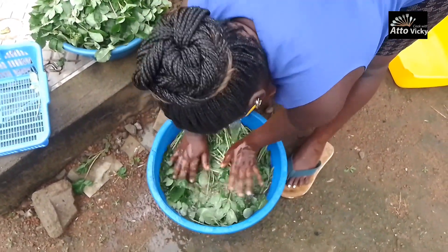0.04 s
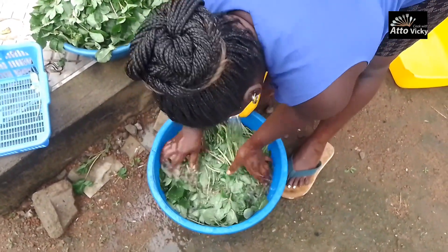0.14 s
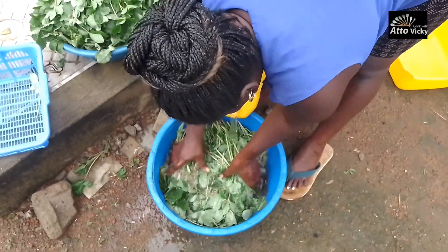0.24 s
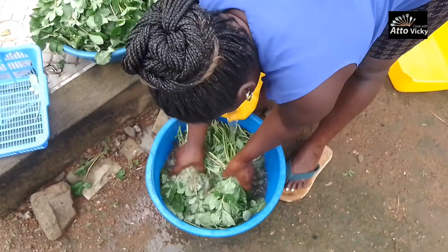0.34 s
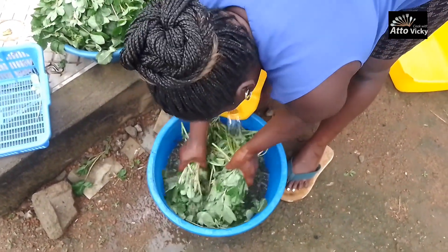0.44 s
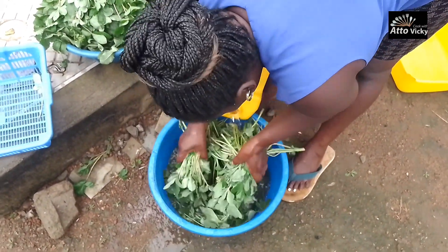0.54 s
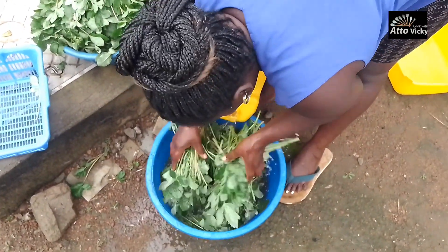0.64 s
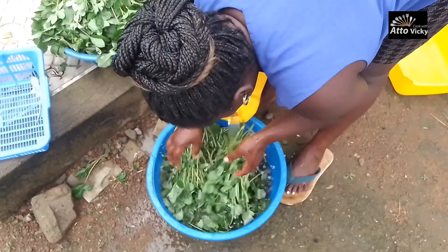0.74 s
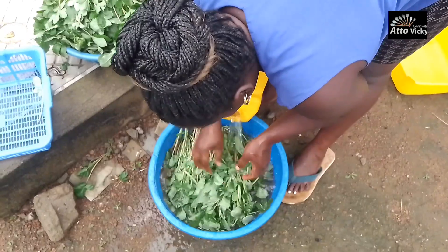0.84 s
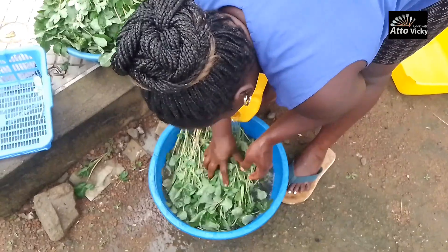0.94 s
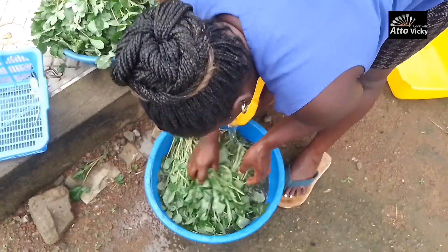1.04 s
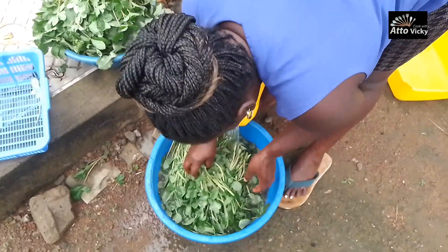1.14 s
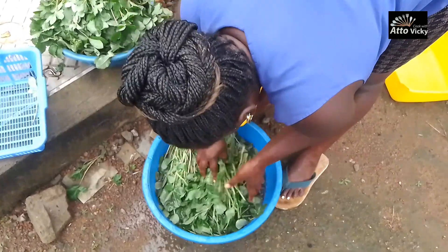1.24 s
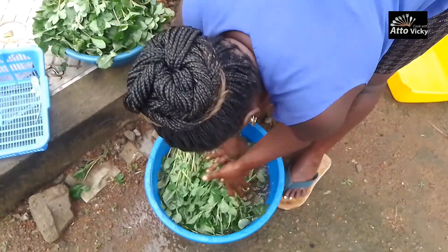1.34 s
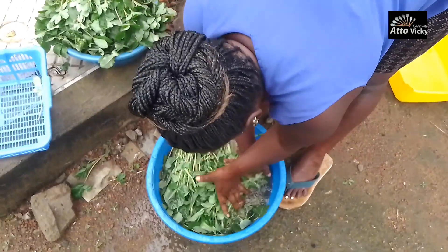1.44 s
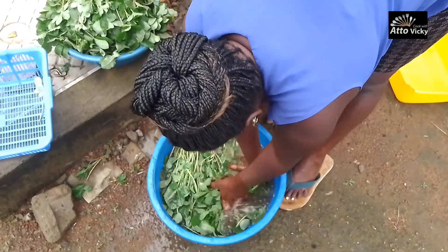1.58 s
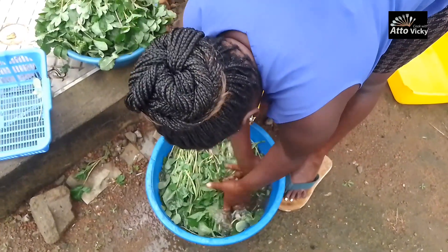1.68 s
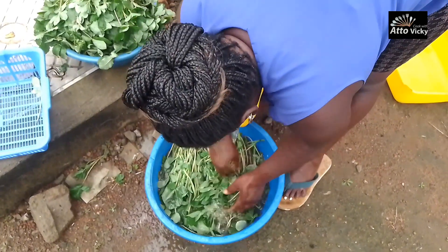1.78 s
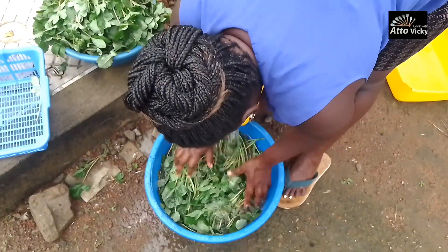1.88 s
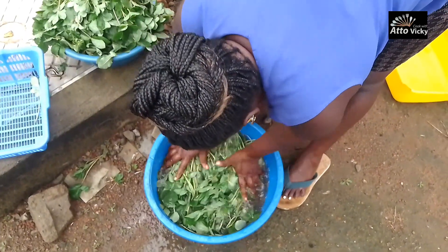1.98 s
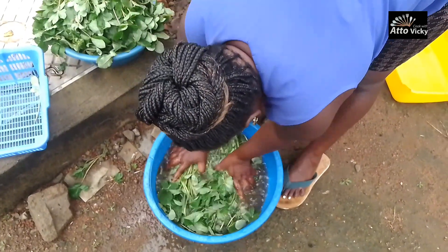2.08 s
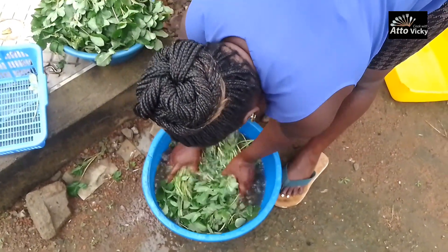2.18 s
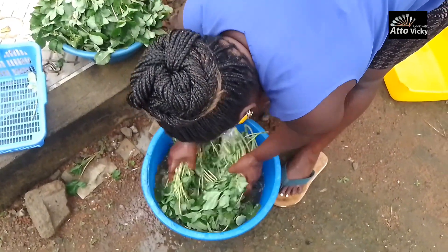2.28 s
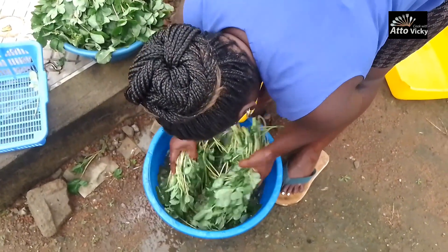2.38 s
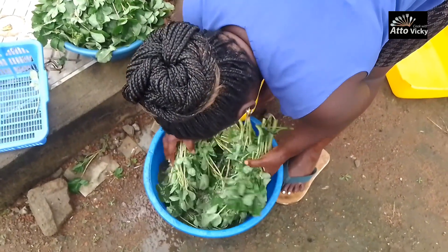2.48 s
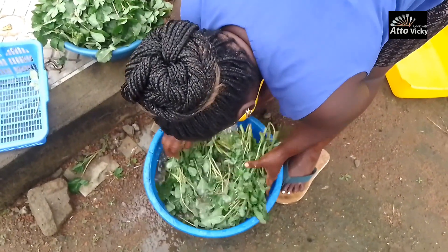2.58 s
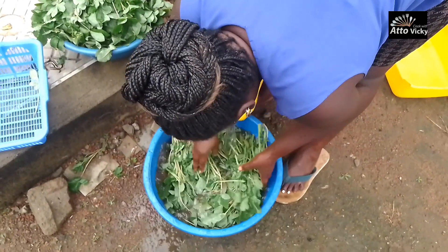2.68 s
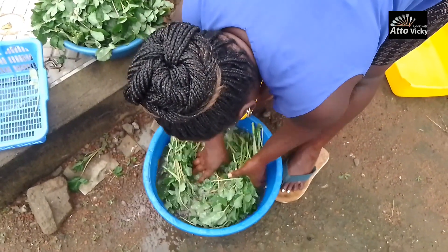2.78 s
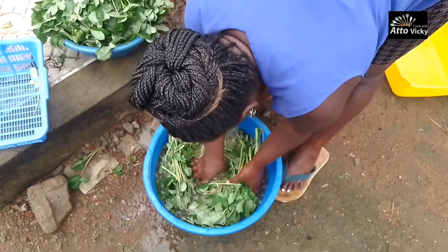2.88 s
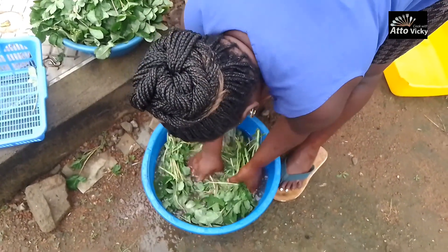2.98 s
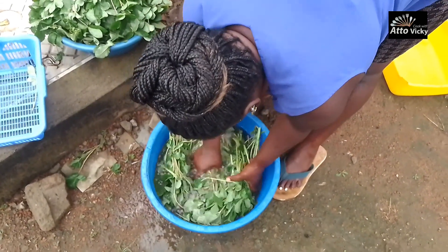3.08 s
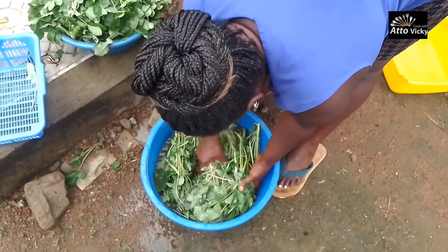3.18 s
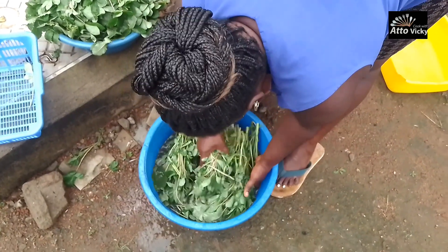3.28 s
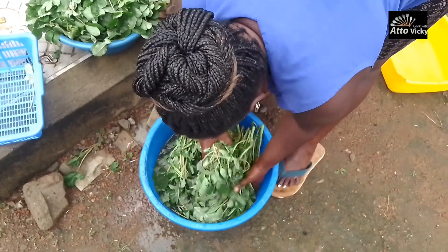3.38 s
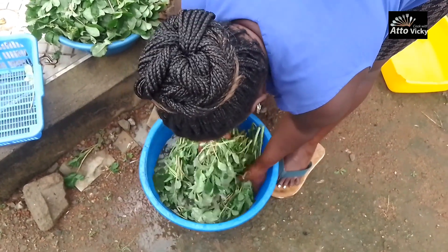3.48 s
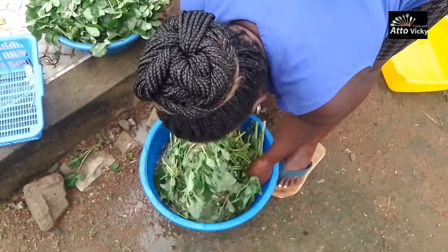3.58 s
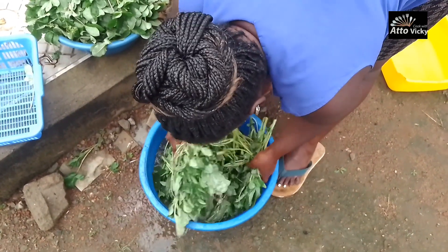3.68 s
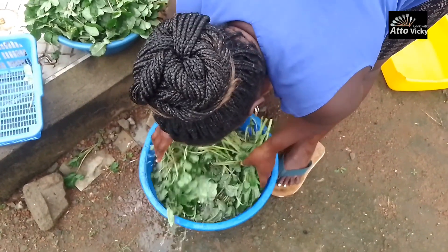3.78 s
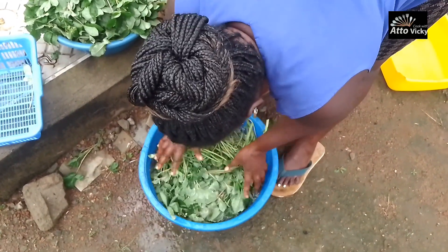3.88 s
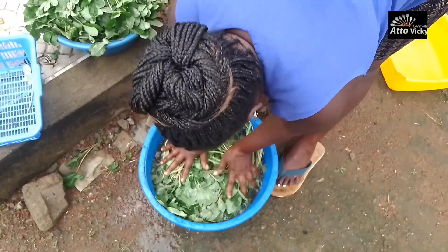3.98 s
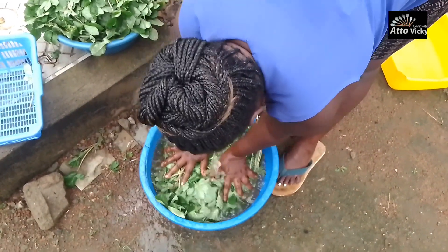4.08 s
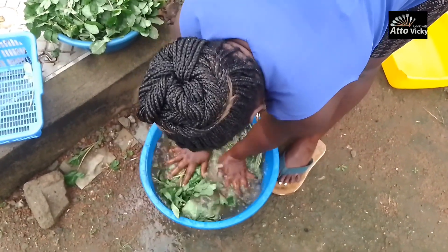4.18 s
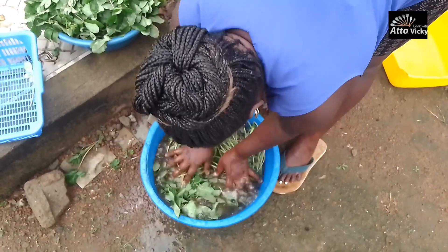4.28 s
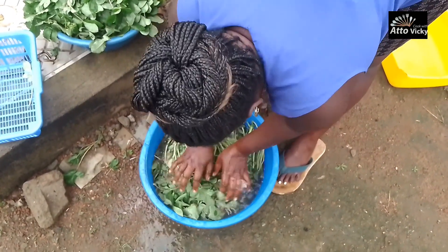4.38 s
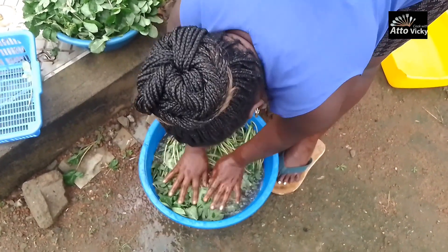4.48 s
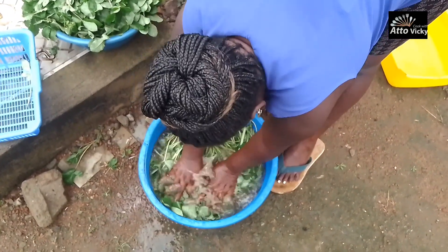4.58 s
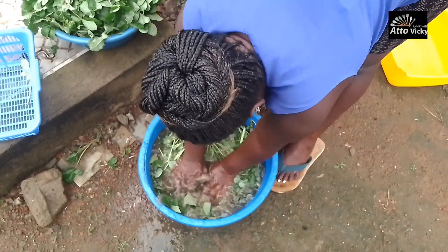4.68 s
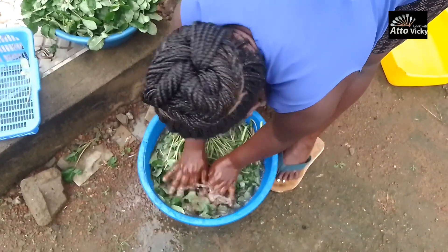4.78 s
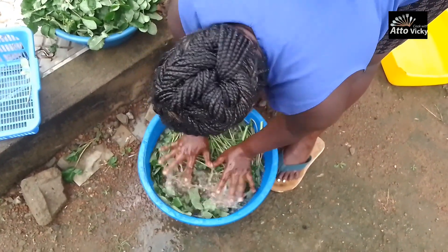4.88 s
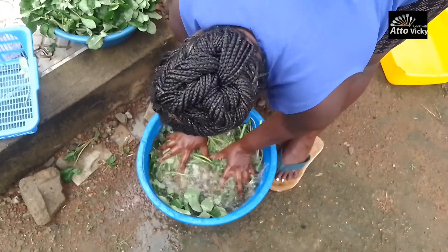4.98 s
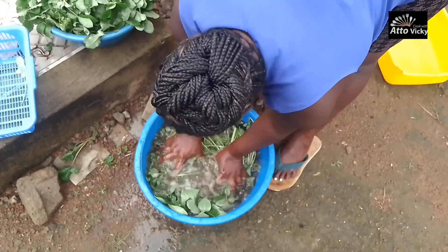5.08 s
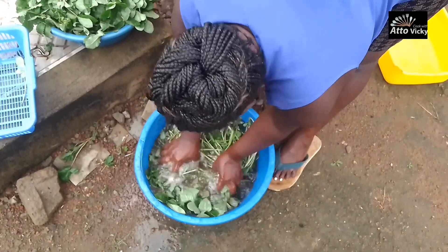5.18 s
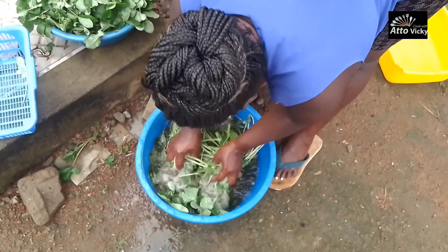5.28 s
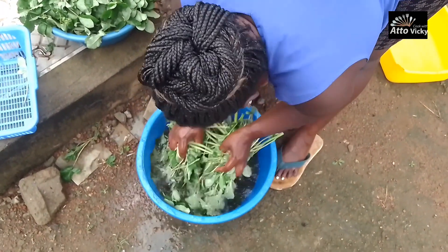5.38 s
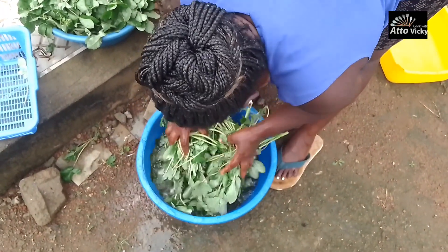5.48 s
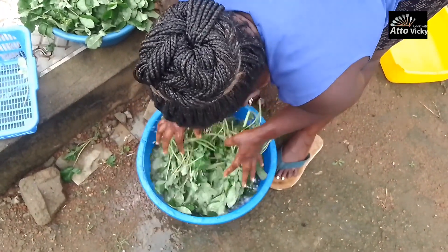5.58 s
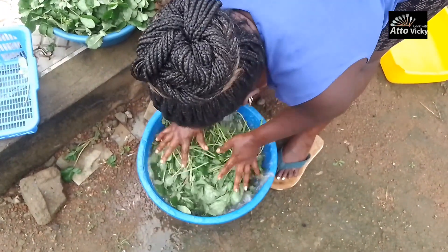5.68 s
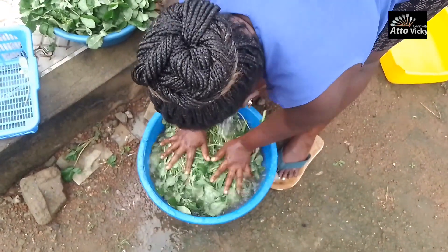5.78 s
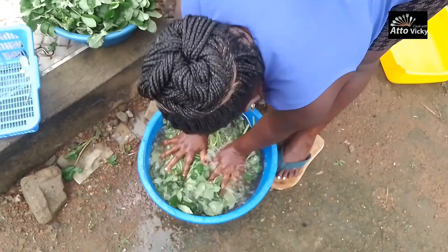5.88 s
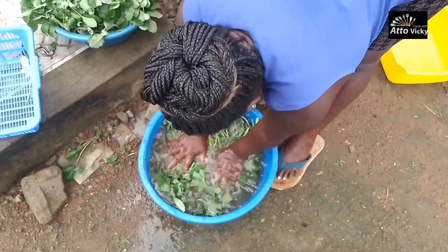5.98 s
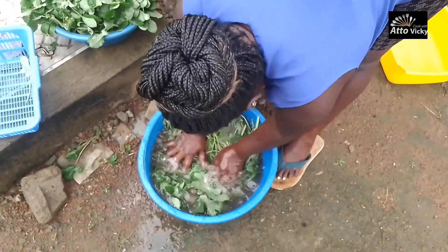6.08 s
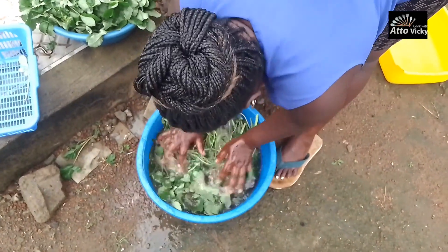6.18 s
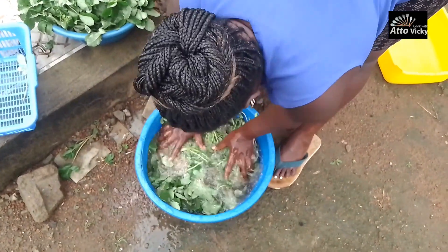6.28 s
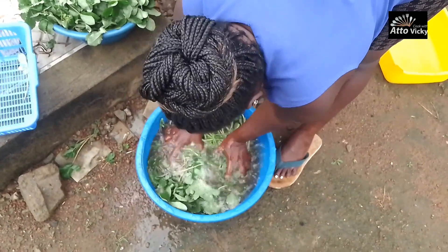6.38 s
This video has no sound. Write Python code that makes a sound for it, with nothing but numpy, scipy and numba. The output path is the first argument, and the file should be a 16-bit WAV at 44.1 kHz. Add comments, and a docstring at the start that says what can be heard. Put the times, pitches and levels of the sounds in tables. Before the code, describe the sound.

Bright, crisp water sounds from a small plastic tub: greens pushed under and squeezed, releasing sprays of tiny bubbles, brittle wet snaps and low bubbling. It starts lightly, bursts hard once early, calms to trickling and glugs, surges twice around a quiet gap, then becomes busy and splashy, the final squeeze still fizzing at the cut. The basin gives a short hollow ring; the outdoor background is only a faint wavering hiss.

```python
"""Hands knead leafy greens in a plastic basin of water outdoors, heard from above, over a faint hiss.
Low plops and light snaps open; a hard squeeze before one second brings a spray of tiny bubbles and a loud snap.
Gentler trickling and low glugs follow, then hard squeezes near 2.7 s, a lull, and another hard one near 3.9 s.
From 4.6 s squeezes crowd together; a last one near 6.35 s, with small snaps, still sprays as the scene ends.
Bubbles are rising, dying sine tones; snaps are noise cracks; the basin adds resonances and echoes."""
import sys
import numpy as np
from scipy import signal
from scipy.fft import rfft, irfft
from scipy.io import wavfile
from scipy.ndimage import uniform_filter1d, map_coordinates
from numba import njit

SR = 44100
rng = np.random.default_rng(int(sys.argv[2]) if len(sys.argv) > 2 else 0)


def persist_wave(psi):
    """Save psi, clipped to +-1, as 16-bit WAV."""
    counts = np.round(np.clip(psi, -1, 1) * 32767).astype(np.int16)
    wavfile.write(sys.argv[1], SR, np.atleast_2d(counts).T)


N = 284004  # length in samples, about 6.4 s

# Tone colour from the echo of the basin rim and the microphone: pitch_hz [Hz], level_db [dB]
RIM_COLOUR = [(150, -33), (230, -18), (650, -13.5), (1100, -10.5), (1430, -30), (1900, -20.5), (2850, -28),
              (4000, -18.5), (6000, -16), (7300, -8), (8200, -3), (10400, -5.5), (11500, -13.5),
              (12800, -10), (14300, -17), (15400, -11.5)]


def undb(db):
    """Turn decibels into an amplitude gain."""
    return 10 ** (np.asarray(db) / 20)


def power_from_db(db):
    """Turn decibels into power, the square of the amplitude gain."""
    return undb(2 * db)


def unit(x):
    """Scale a signal to an rms level of 1."""
    return x / np.sqrt(np.mean(x ** 2))


def shape(x, table):
    """Filter through (Hz, dB) points; folding the cepstrum makes the filter respond without looking ahead."""
    hz, db = np.transpose(table)
    size = 2048
    grid_hz = np.maximum(np.arange(size // 2 + 1), 1) * SR / size
    log_gain = np.interp(np.log(grid_hz), np.log(hz), db) * np.log(10) / 20
    cepstrum = irfft(log_gain)
    cepstrum[1:size // 2] *= 2
    cepstrum[size // 2 + 1:] = 0
    impulse = irfft(np.exp(rfft(cepstrum)))
    return signal.fftconvolve(x, impulse)[:N]


def walk(rate_hz):
    """Random levels, each held for one step and smoothed into the next, with an rms of 1."""
    hold = int(SR / rate_hz)
    steps = np.repeat(rng.standard_normal(N // hold + 1), hold)
    return unit(uniform_filter1d(steps, hold)[:N])


def curves(table):
    """Join the columns of a table by straight lines in time."""
    s, *columns = np.transpose(table)
    return [np.interp(np.arange(N) / SR, s, column) for column in columns]


def swell(peak_s, rise_s, fall_s):
    """Power of one movement: it climbs and falls steadily in dB around a rounded top."""
    rounding = 0.2  # as a share of the rise or fall time
    t = np.arange(N) / SR - peak_s
    # very short or negative times are held at a small minimum
    away = np.where(t < 0, t / max(rise_s, .012), t / max(fall_s, .03))
    return power_from_db(-20 * (np.hypot(away, rounding) - rounding))


def kneading():
    """Each squeeze presses the leaves under; its power adds to that of water draining between squeezes."""
    # Squeezes: peak_s [s], rise_s and fall_s [s, for 20 dB on the straight slopes, with a minimum],
    # then fine_spray_db, coarse_spray_db, gurgle_db [dB, before the top is rounded and powers add]
    squeezes = [(0.006, -6, 0.37, -58, -68.5, -64.5), (0.404, 0.15, 0.28, -46, -57.5, -60),
                (0.553, 0.27, 0.19, -49.5, -63.5, -52), (0.871, 0.057, 0.05, -38.5, -48.5, -41),
                (0.881, 0.14, 0.2, -47.5, -60.5, -59.5), (1.132, 0, 0.04, -48.5, -62.5, -61),
                (1.478, 0.07, 0.4, -56.5, -68, -68), (1.763, 0.04, 0.09, -56.5, -69, -97),
                (2.096, 0.0447, 0.24, -46.5, -59, -64), (2.393, 0.12, 0.36, -48, -64, -74),
                (2.601, -0.18, 0.41, -51, -72, -51), (2.708, 0.0336, 0.17, -37, -44.5, -44.5),
                (2.772, 0.0136, 0.0526, -34, -44.5, -47), (2.949, 0.12, 0.01, -49, -64.5, -84),
                (3.568, 0.44, 1.5, -55.5, -68.5, -70), (3.896, 0.0359, -0.06, -36.5, -49, -54),
                (3.94, 0.06, -0.0728, -31, -43.5, -45.5), (4.175, 0.22, 0.22, -46.5, -56.5, -54),
                (4.315, -0.15, 0.22, -50, -62, -61.5), (4.616, -0.1655, 0.09, -38.5, -50, -52.5),
                (4.674, -0.14, 0.13, -52, -54, -56.5), (4.862, 0.0947, 0.18, -43, -51.5, -46),
                (5.052, -0.2, -0.01, -33.5, -48, -53), (5.411, 0.11, 0.72, -51.5, -64, -54.5),
                (5.703, 0.0123, 0.11, -32, -42, -42), (5.93, 0.06, 0.26, -41.5, -55.5, -56.5),
                (5.973, 0.02, 0, -56, -46, -52), (6.35, -0.01, 2.5, -41.5, -53.5, -70)]
    # Water draining through the leaves: time_s [s], fine_spray_db [dB]
    trickle = [(0.0, -69), (1.0, -59.5), (1.35, -67.5), (1.7, -57), (2.0, -65), (2.2, -55.5), (2.9, -89),
               (3.05, -56.5), (3.25, -60), (3.7, -60.5), (4.5, -59), (5.2, -48.5), (5.6, -74.5),
               (5.85, -56), (6.28, -54.5), (6.44, -53)]
    coarse_db, gurgle_db = -15.5, -20.5  # trickle levels relative to its fine spray
    fine = power_from_db(curves(trickle)[0])
    coarse = fine * power_from_db(coarse_db)
    low = fine * power_from_db(gurgle_db)
    for peak_s, rise_s, fall_s, squeeze_fine_db, squeeze_coarse_db, squeeze_low_db in squeezes:
        power = swell(peak_s, rise_s, fall_s)
        fine = fine + power_from_db(squeeze_fine_db) * power
        coarse = coarse + power_from_db(squeeze_coarse_db) * power
        low = low + power_from_db(squeeze_low_db) * power
    return np.sqrt(fine), np.sqrt(coarse), np.sqrt(low)


@njit
def ring(n, start, hz, cycles, glide, size, onset):
    """Bubbles: each swells over a share of its life, dies in a few cycles (to 1/e) and rises in pitch."""
    y = np.zeros(n)
    for k in range(len(start)):
        life = cycles[k] * SR / hz[k]  # in samples
        phase = 0.
        for i in range(min(int(5 * life), n - start[k])):
            cycles_per_sample = min(hz[k] * (1 + glide * i / life) / SR, .45)
            phase += 2 * np.pi * cycles_per_sample
            envelope = np.exp(-i / life) * (1 - np.exp(-i / (onset * life)))
            y[start[k] + i] += size[k] * envelope * np.sin(phase)
    return y


def swarm(per_s, hz_of, cycles, glide, scatter_db, onset):
    """Bubbles at random moments: many small, few large, with equal mean energy at any pitch."""
    u = rng.random((int(per_s * N / SR), 4)).T
    start = (u[0] * N).astype(np.int64)
    hz = hz_of(start, u[1])
    # high bubbles die sooner, so they start louder
    size = undb(-scatter_db * np.log(1 - u[2])) * np.sqrt(hz)
    return ring(N, start, hz, cycles * (.5 + u[3]), glide, size, onset)


def steady(x, window_s):
    """Colour a sound by rim and microphone, then even out its slow level."""
    x = shape(x, RIM_COLOUR)
    mean_power = uniform_filter1d(x ** 2, int(window_s * SR))
    return unit(x / np.sqrt(mean_power + 1e-12))


def spray(lo_hz, hi_hz, per_s, cycles, scatter_db, spurt_db, ping_db):
    """Tiny bubbles of all sizes between two pitches in quick spurts; a few ring on for longer."""
    def any_pitch(at, u):
        return lo_hz + (hi_hz - lo_hz) * u
    fizz = unit(swarm(per_s, any_pitch, cycles, 0.059, scatter_db, 0.12))
    pings = unit(swarm(per_s / 12, any_pitch, 29.0, 0.0071, 2.63, 0.078))
    # slower and quicker random changes make the spurts
    spurts = undb(spurt_db * (0.66 * walk(40) + 0.71 * walk(400)))
    return steady((fizz + undb(ping_db) * pings) * spurts, 0.091)


def gurgle(pitch_hz, per_s, spread, cycles):
    """Air pockets escape from the leaves as bubbles scattered in pitch round a moving centre."""
    def near_centre(at, u):
        return pitch_hz[at] * np.exp(spread * (u - .45))
    return steady(swarm(per_s, near_centre, cycles, 0.023, 1.9, 0.11), 0.07)


def squeeze_gurgle(low):
    """Squeezed-out air bubbles; harder squeezes tear off smaller ones, which sound higher."""
    middle_hz, hz_per_db = 795.3, 7  # centre pitch at a gurgle gain of -50 dB, and its rise with level
    low_db = 20 * np.log10(low)
    pitch_hz = np.clip(middle_hz + hz_per_db * (low_db + 50), 300, 1100)
    return low * gurgle(pitch_hz, 450, 1.387, 3.48)


def glugs():
    """Larger air pockets glug out as the leaves shift: runs of big bubbles, pitched by the loudest glug."""
    # Glugs: peak_s [s], length_s [s, the fall time before its minimum],
    # level_db [dB, before the top is rounded], pitch_hz [Hz, around which bubbles scatter]
    air_pockets = [(0.191, 0.12, -54.5, 309), (0.269, 0.03, -52, 496), (0.869, 0.064, -53, 341),
                   (1.234, 0.092, -50, 394.5), (1.563, 0.13, -58.5, 502), (1.918, 0.058, -57.5, 292),
                   (2.253, 0.065, -55, 450), (2.486, 0.18, -54.5, 588), (2.985, 0.084, -62, 298),
                   (3.414, 0.19, -62.5, 522), (3.578, 0.024, -63, 293), (3.67, 0.063, -65, 325),
                   (3.985, 0.087, -54.5, 425), (4.361, 0.056, -48.5, 442), (5.435, 0.1, -48.5, 680.0)]
    rise_share = 0.95  # rise time as a share of length_s
    powers = []
    for peak_s, length_s, level_db, _ in air_pockets:
        powers.append(power_from_db(level_db) * swell(peak_s, rise_share * length_s, length_s))
    powers = np.array(powers)
    pitch_hz = np.array(air_pockets)[powers.argmax(axis=0), -1]
    return np.sqrt(powers.sum(axis=0)) * gurgle(pitch_hz, 140, 0.704, 3.1)


def snaps():
    """Each water film tears in a ragged noise crack of a millisecond or two, some duller, some brighter."""
    # Snapping films: start_s [s], level_db [dB, before the shared trim and the random peaks of the noise]
    films = [(0.074, -28.5), (0.2492, -25.5), (0.3216, -29), (0.379, -18.5), (0.4477, -19), (0.7816, -25),
             (0.8583, -16), (0.8804, -7.5), (1.459, -28), (1.755, -27), (1.8267, -29), (2.0881, -20),
             (2.0954, -26), (2.166, -21.5), (2.2336, -27), (2.293, -23.5), (2.5175, -27), (2.6383, -24),
             (2.6692, -18.5), (2.716, -21), (2.7646, -14), (2.772, -13), (2.9451, -17.5), (2.9554, -26),
             (2.991, -25), (3.0809, -27), (3.4321, -45), (3.862, -18), (3.9045, -20), (3.9364, -11),
             (4.0796, -39), (4.145, -22), (4.222, -28), (4.2497, -33.5), (4.309, -37), (4.3165, -23),
             (4.324, -31), (4.342, -26.5), (4.3625, -32.5), (4.376, -24), (4.6215, -12.5), (4.7728, -17),
             (4.8289, -26), (4.8512, -19), (4.8758, -24), (5.0084, -24), (5.046, -15.5), (5.0946, -25),
             (5.1736, -29), (5.2116, -29), (5.3632, -36), (5.474, -28), (5.57, -33), (5.687, -18),
             (5.9123, -22), (5.9252, -12.5), (6.04, -30), (6.0682, -20.5), (6.0766, -25), (6.093, -47),
             (6.1215, -26.5), (6.1464, -27), (6.1852, -22), (6.327, -24), (6.3335, -22), (6.347, -29.5),
             (6.3607, -19), (6.3742, -21), (6.3949, -26)]
    rise_s, fall_s, trim_db = 0.00025, 0.0015, -7
    tilt_db = 6.5  # spread of brightness from snap to snap
    t = np.arange(int(.012 * SR)) / SR
    envelope = (1 - np.exp(-t / rise_s)) * np.exp(-t / fall_s)
    body, top = (shape(rng.standard_normal(N), RIM_COLOUR) for _ in range(2))
    body = signal.lfilter(*signal.butter(1, 5000, "high", fs=SR), body)
    top = signal.sosfilt(signal.butter(3, 10500, "high", fs=SR, output="sos"), top)
    out = np.zeros(N + len(t))
    for (start_s, level_db), tilt in zip(films, rng.standard_normal(len(films))):
        at = slice(int(start_s * SR), int(start_s * SR) + len(t))
        crack = envelope * (body[at] + undb(-3 + tilt_db * tilt) * top[at])
        crack_rms = np.sqrt(np.sum(crack ** 2) / np.sum(envelope ** 2))
        out[at] += undb(level_db + trim_db) * crack / crack_rms
    return out[:N]


def plops():
    """Big bubbles and drops each ring as one low tone that rises a little as it dies."""
    # Plops: start_s [s], level_db [dB, before the swell and decay], pitch_hz [Hz, at the start]
    drops = [(0.066, -42, 433), (0.116, -37, 350), (0.137, -39.5, 357), (0.157, -40, 393),
             (0.277, -45, 600), (0.259, -38.5, 747), (0.487, -36.5, 660), (0.534, -33, 860),
             (0.789, -37.5, 865), (0.843, -26.5, 860), (1.122, -41.5, 467), (1.199, -38.5, 625),
             (1.251, -41.5, 520), (1.456, -47, 615), (1.595, -36.5, 920), (1.85, -47.5, 303),
             (2.164, -46, 507), (2.24, -49, 466), (2.384, -36.5, 887), (2.596, -33.5, 626),
             (2.956, -36, 633), (3.216, -45.5, 560), (4.323, -40, 490), (4.351, -38.5, 616),
             (4.617, -39, 1086), (4.707, -34.5, 824), (4.769, -35.5, 727), (4.827, -33.5, 715),
             (5.37, -39, 776), (5.42, -35.5, 655), (5.678, -31, 760), (6.11, -36.5, 947)]
    start_s, level_db, pitch_hz = np.transpose(drops)
    start = (start_s * SR).astype(np.int64)
    cycles = np.full(len(start), 3.8)
    return ring(N, start, pitch_hz, cycles, 0.026, undb(level_db), 0.28)


@njit
def svf(x, hz, width):
    """Band-pass filter with a moving centre: two linked stores trade energy; gain 1 at the centre."""
    y, band, low = np.empty(len(x)), 0., 0.
    for i in range(len(x)):
        g, k = np.tan(np.pi * hz[i] / SR), width / hz[i]
        v = (band + g * (x[i] - low)) / (1 + g * (g + k))
        band, low, y[i] = 2 * v - band, low + 2 * g * v, k * v
    return y


def basin(x):
    """Resonances swell and drift as hands and leaves move; a wall bounce and a patter of echoes follow."""
    # Narrow resonances of the air inside: pitch_hz [Hz, before shifting], width_hz [Hz],
    # level_db [dB, before the opening and random changes]
    narrow = [(1810, 365, -1.5), (4050, 430, -5.5), (5110, 170, -3.5), (6880, 148, -1), (8330, 253, 4.5),
              (10550, 100, -10)]
    # Broad brightness that fades as the narrow resonances grow: the same columns
    broad = [(9880, 1250, -4), (13100, 730, -4.5)]
    # Hands uncover the basin: time_s [s], strength_db [dB], pitch_shift [ratio]
    opening = [(0, -2.5, 0.82), (0.5, 3.5, 0.98), (1.0, 0, 0.88), (1.55, 0, 0.91), (2.0, -1.5, 0.95),
               (2.7, -1, 0.97), (3.1, 7, 0.98), (3.8, 1.5, 0.98), (4.5, 5.5, 0.98), (5.25, 3, 0.95),
               (5.6, -0.5, 0.96), (6.44, 1, 0.98)]
    bounce_s, bounce_db = 0.00153, -12  # delay before dividing by the shift, and level
    open_db, shift = curves(opening)
    for hz, width_hz, db in narrow:
        gain = undb(db + open_db + 2.1 * walk(2.47))
        centre_hz = hz * shift * (1 + 0.015 * walk(3.4))
        x = x + gain * svf(x, centre_hz, 1. * width_hz)
    for hz, width_hz, db in broad:
        gain = undb(db - open_db + 2.5 * walk(3.71))
        x = x + gain * svf(x, hz * shift, 1. * width_hz)
    # sound returning from the wall ripples the treble
    read_at = np.arange(N) - bounce_s * SR / shift
    x = x + undb(bounce_db) * map_coordinates(x, [read_at], mode="mirror")
    t = np.arange(int(.08 * SR)) / SR
    echoes = rng.standard_normal(len(t)) * np.exp(-t / 0.015) * (t > .001)
    echoes = echoes / np.sqrt(np.sum(echoes ** 2))
    return x + undb(-11) * signal.fftconvolve(x, echoes)[:N]


def outdoor_hiss():
    """Faint outdoor air: coloured noise whose level wavers at random."""
    # Colour of the outdoor hiss: pitch_hz [Hz], level_db [dB per Hz, before scaling to the overall level]
    air_colour = [(25, -20), (110, -10), (160, -20), (628, 0.5), (1420, -18), (2870, -15), (6150, -8),
                  (8200, -6.5), (15800, -7.5)]
    level_db = -65.5  # overall level, around which it wavers
    gain = undb(level_db + 2.1 * walk(8.8))
    return gain * unit(shape(rng.standard_normal(N), air_colour))


def scene():
    """Spray, gurgle, glugs, snaps and plops sound in the basin, over the outdoor hiss."""
    fine, coarse, low = kneading()
    # spurts merge into a smooth gush as the fine spray nears the gush level
    gush_db, gush_range_db = -27.5, 23
    patchy = np.clip((gush_db - 20 * np.log10(fine)) / gush_range_db, .15, 1)
    fine_spray = fine * spray(5512, 16470, 9000, 1.7, 2.7, 4.33 * patchy, -1.4)
    coarse_spray = coarse * spray(1498, 5972, 2500, 3.3, 1.5, 3.8 * patchy, -4.0)
    low_bubbles = squeeze_gurgle(low) + glugs()
    water = basin(fine_spray + coarse_spray + low_bubbles + snaps() + plops())
    # the microphone hears little bass from the water
    low_cut_hz = 174
    water = signal.sosfilt(signal.butter(6, low_cut_hz, "high", fs=SR, output="sos"), water)
    return (water + outdoor_hiss())[None]


def record(dry):
    """The phone's steep low-pass filter cuts the top of the treble."""
    top_hz = 15900
    return signal.sosfilt(signal.ellip(10, .2, 70, top_hz, fs=SR, output="sos"), dry)


dry = scene()
out = record(dry)
persist_wave(out)
```